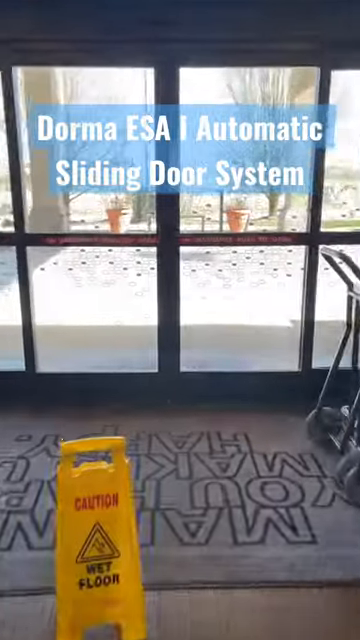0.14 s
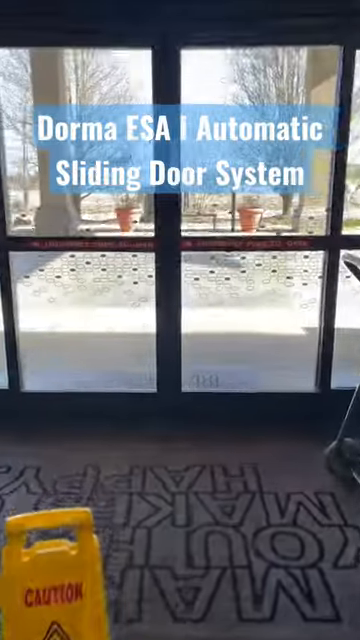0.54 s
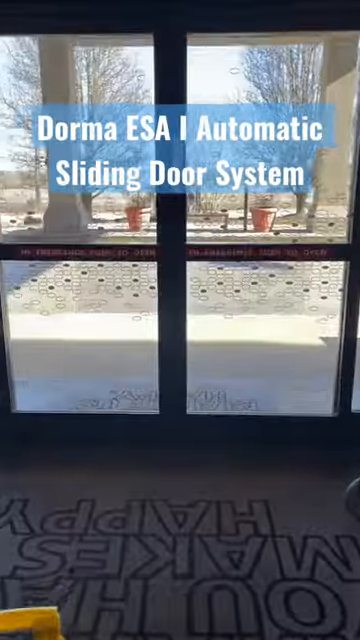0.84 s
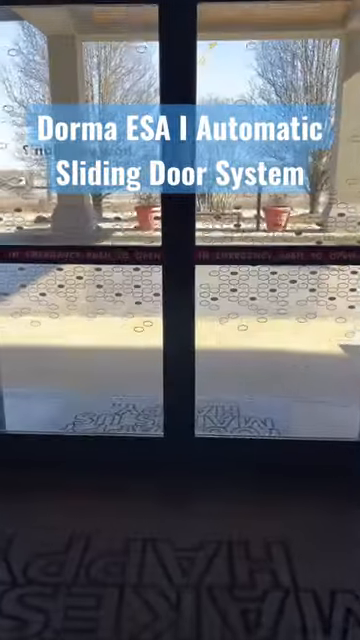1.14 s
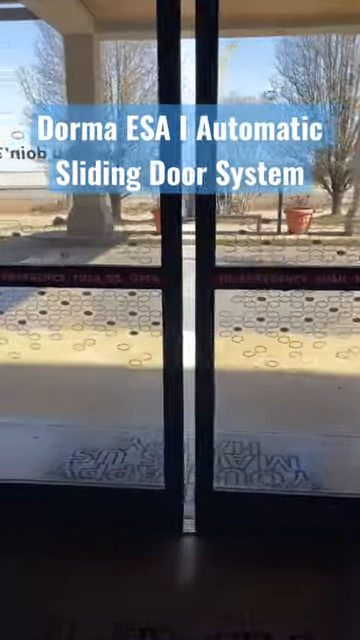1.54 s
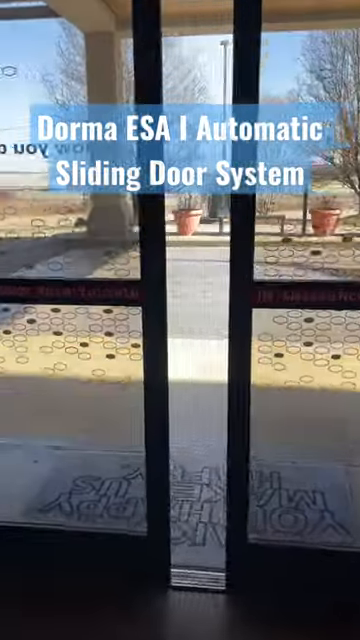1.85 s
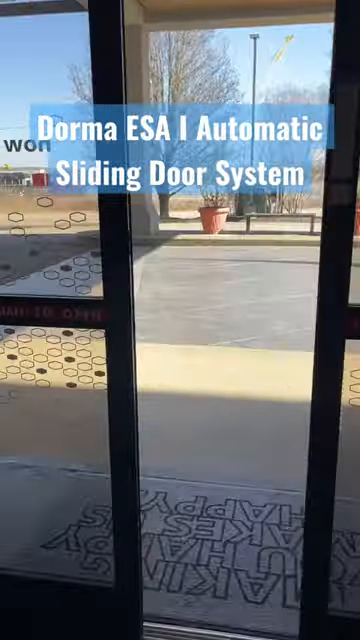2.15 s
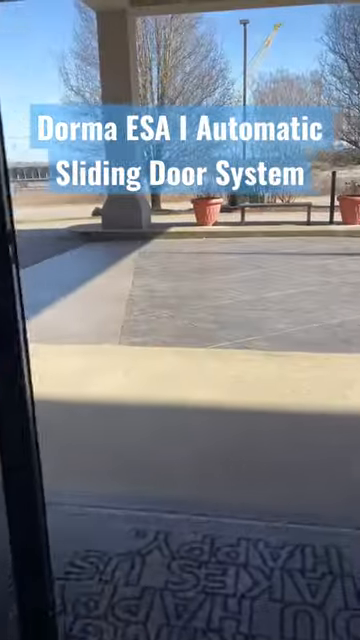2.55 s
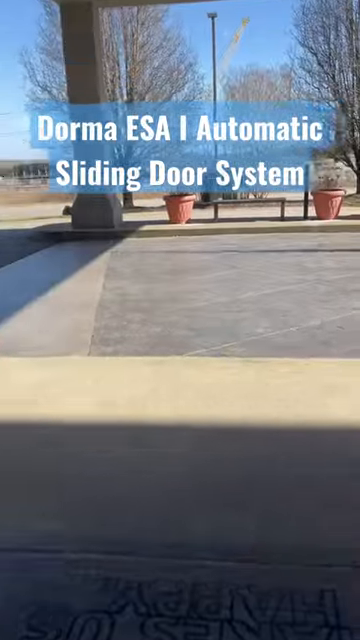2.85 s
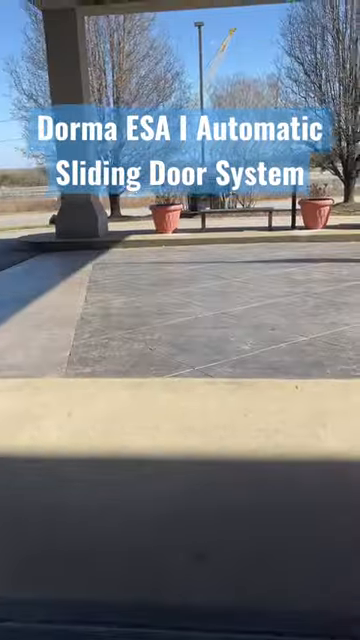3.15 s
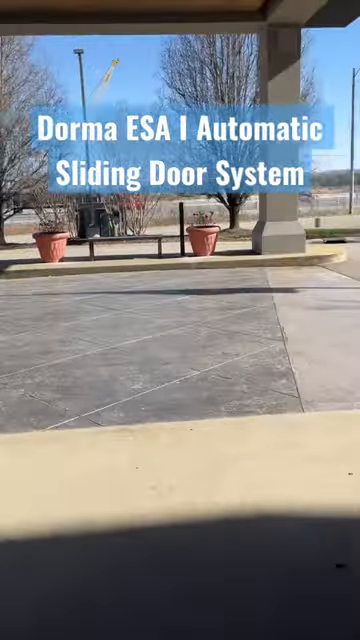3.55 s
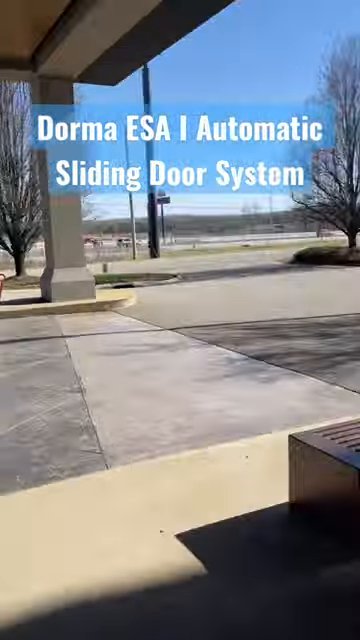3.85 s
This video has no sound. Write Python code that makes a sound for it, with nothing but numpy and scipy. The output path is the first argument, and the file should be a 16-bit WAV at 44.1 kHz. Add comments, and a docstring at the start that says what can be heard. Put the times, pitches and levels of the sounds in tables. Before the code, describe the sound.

Automatic sliding doors click and rumble open after a few soft steps in a quiet lobby. An idling engine and traffic swell, small metal pieces jingle, and a car passes as the microphone is carried outside.

```python
"""Someone carries a phone across a lobby and out through automatic glass sliding doors.
First come a swish, soft steps and the clinks of small metal pieces ringing in their modes.
A double click follows; the drive whines and the rollers rumble as the panels gather speed.
As the gap widens, the throb of an idling engine and the wash of traffic swell, and the metal jingles.
Last, a car passes and low booms rise as the walker steps outside."""
import sys
import numpy as np
from scipy import signal
from scipy.fft import rfft, irfft
from scipy.io import wavfile
from scipy.ndimage import uniform_filter1d

SR = 44100
rng = np.random.default_rng(int(sys.argv[2]) if len(sys.argv) > 2 else 0)


def generate_wav(signal):
    """Clip the signal to [-1, 1] and save it as 16-bit WAV at the path in sys.argv[1]."""
    frames = np.transpose(np.atleast_2d(signal))
    scaled = np.clip(frames, -1, 1) * 32767
    pcm = np.round(scaled).astype(np.int16)
    wavfile.write(sys.argv[1], SR, pcm)


N = 176400
TIME = np.arange(N) / SR
CLICK_RISE_S = 0.0014


def amp(db):
    """Amplitude ratio of a level in decibels."""
    return 10 ** (np.asarray(db) / 20)


def unit(x):
    """Normalisation to rms 1."""
    return x / np.sqrt(np.mean(x ** 2) + 1e-20)


def spectrum_at(table, hz, column=1):
    """Interpolation of a table in log frequency."""
    table = np.array(table)
    return np.interp(np.log(hz + 1), np.log(table[:, 0] + 1), table[:, column])


def envelope_at(table, t, column=1):
    """Linear interpolation of a table in time."""
    table = np.array(table)
    return np.interp(t, table[:, 0], table[:, column])


def resonances(table, hz):
    """Power summation of resonance peaks, in dB."""
    powers = (amp(db) ** 2 / (1 + (2 * (hz - centre) / width) ** 2) ** 1.5 for centre, width, db in table)
    return 10 * np.log10(sum(powers))


def add(mix, start, sound):
    """Superposition of a sound on the mix from a start time in seconds."""
    part = mix[:, max(round(start * SR), 0):][:, :sound.shape[1]]
    part += sound[:, :part.shape[1]]


def drift(rate_hz):
    """Random modulation: low-passed noise of rms 1."""
    hz = np.fft.rfftfreq(N, 1 / SR)
    return unit(irfft(rfft(rng.standard_normal(N)) * np.exp(-(hz / rate_hz) ** 2), N))


def noise(colour, size=N):
    """Spectral shaping: two uncorrelated noises, mid and side, of density colour(hz) in dB/Hz."""
    hz = np.fft.rfftfreq(size, 1 / SR)
    return irfft(rfft(rng.standard_normal((2, size))) * amp(colour(hz)), size) * np.sqrt(SR / 2)


def burst(colour, t60, rise_s):
    """Exponential damping: coloured noise rises, then falls 60 dB in t60 seconds."""
    t = TIME[:SR // 2]
    return unit(noise(colour, size=len(t))) * np.minimum(t / rise_s, 1) * amp(-60 * t / t60)


def lobby_echo(x):
    """Reverberation: reflections from glass and tile merge into a short diffuse tail."""
    tail = burst(lambda f: -10 * np.log10(1 + (f / 9000) ** 2), t60=0.37, rise_s=0.011)
    return signal.fftconvolve(x, tail / np.linalg.norm(tail[0]), axes=1)[:, :N]


# microphone pair (frequency [Hz], coherence [0-1], left phase lead [rad], left minus right [dB])
MIC_PORTS = [(20, 1, 0, 0), (130, .995, 0, .5), (330, .95, 0, 0), (550, .65, .4, .7), (850, .35, 1.2, 3.5),
             (1150, .3, 0, 3.8), (1700, .5, .2, .3), (2300, .2, .9, 4), (3800, .62, .6, 2.4),
             (5300, .4, .6, 4.6), (6300, .62, .2, 1.6), (7200, .5, 1, 3), (8500, .94, 0, .3),
             (9300, .83, -1.4, .4), (10200, .98, -3.1, 0), (11200, .82, -4.9, 0), (12000, .98, -6.2, 0)]
def microphone_pair(x):
    """Partial coherence: two ports add and subtract the side signal, each with its own phase and gain."""
    size = N + 4096
    hz = np.fft.rfftfreq(size, 1 / SR)
    coherence, lead, balance = (spectrum_at(MIC_PORTS, hz, column=k) for k in (1, 2, 3))
    mid, side = rfft(x, size)
    mid *= np.sqrt((1 + coherence) / 2)
    side *= np.sqrt(np.maximum(1 - coherence, 0) / 2)
    lean = amp(balance / 2) * np.exp(.5j * lead)
    return irfft(np.array([(mid + side) * lean, (mid - side) / lean]), size)[:, :N]


# still air of the lobby (frequency [Hz], density [dB/Hz])
AIR_SPECTRUM = [(20, -79), (42, -64.5), (56, -69.5), (76, -59.5), (90, -63.5), (115, -65.5), (160, -66),
                (220, -67.5), (300, -76), (520, -84), (820, -86), (1050, -87.5), (1800, -91.5),
                (2100, -101), (4000, -107), (6500, -110), (11200, -109), (12500, -132)]
def lobby_air():
    """Stationary noise: the room's steady floor, strongest in the bass."""
    return noise(lambda f: spectrum_at(AIR_SPECTRUM, f))


# traffic under the canopy (frequency [Hz], density [dB/Hz])
TRAFFIC_SPECTRUM = [(20, -74), (40, -67), (58, -47), (72, -49), (86, -52.5), (112, -44), (160, -54.5),
                    (235, -49.5), (310, -60), (400, -59.5), (560, -69), (800, -65.5), (1000, -71.5),
                    (1800, -76.5), (2100, -81.5), (2700, -83.5), (4000, -93), (6500, -107), (11000, -111),
                    (12500, -134)]
# gain on the street's sound (time [s], rumble [dB], tyre roar [dB], treble [dB])
DOORWAY_GAIN = [(0, -26, -16, -43), (1.3, -24.5, -15.5, -15.5), (1.6, -14.5, -12.5, -9.5),
                (1.72, -10, -5.5, -9.5), (2.12, -9, -6.5, -6.5), (2.22, -6, -2.5, -7.5),
                (2.7, -2.5, -1.5, 0), (3.0, -.5, -2.5, -3), (3.35, -1.5, 4.5, -2.5), (3.52, -0.5, 3, -4),
                (3.66, 0.5, 2.5, -2), (3.85, -.5, 3.5, -0.5), (4, -1.5, 1.5, 1.5)]
def traffic():
    """Transmission through an aperture: the widening gap admits the street, the treble gaining most."""
    frames = dict(fs=SR, nperseg=1024, noverlap=768)
    hz, t, wash = signal.stft(noise(lambda f: spectrum_at(TRAFFIC_SPECTRUM, f)), **frames)
    band_hz = [280, 700, 3000]
    shares = [np.interp(np.log(hz + 1), np.log(band_hz), row)[:, None] for row in np.eye(3)]
    gain_db = sum(share * envelope_at(DOORWAY_GAIN, t, column=k) for k, share in enumerate(shares, 1))
    # the level wanders in patches of pitch and time, least in the rumble
    patches = uniform_filter1d(rng.standard_normal(wash.shape[1:]), size=10, axis=0)
    patches = unit(uniform_filter1d(patches, size=12, axis=1))
    patch_db = (1.5 - shares[0]) * patches
    _, admitted = signal.istft(wash * amp(gain_db + patch_db), **frames)
    flutter_db = 0.7 * drift(28)
    return admitted[:, :N] * amp(flutter_db)


# tyre resonances (frequency [Hz], width [Hz], peak density [dB/Hz])
TYRE_PEAKS = [(776, 44, -58.5), (875, 38, -56.5), (1140, 340, -67.5)]
def passing_car(nearest_s=3.42, half_width_s=.2):
    """Attenuation with distance: tyres sing on the road, loudest as the car passes nearest."""
    return noise(lambda f: resonances(TYRE_PEAKS, f)) / (1 + ((TIME - nearest_s) / half_width_s) ** 2)


# harmonics of the idling engine (time [s], fundamental level [dB], octave level [dB])
IDLE_LEVELS = [(0, -43, -42), (0.2, -38.5, -45), (0.5, -36.5, -51.5), (0.9, -37.5, -44.5),
               (1.33, -44, -49.5), (1.41, -40, -37), (2.0, -49, -36), (2.55, -61, -32.5), (2.8, -48, -36),
               (3.05, -37, -31.5), (3.48, -32, -31.5), (3.66, -21.5, -34.5), (3.72, -24.5, -30),
               (3.85, -39, -43), (4, -24.5, -33)]
def engine(firing_hz=66.05, waver_hz=1.47, throb_db=1.1):
    """Periodic excitation: slightly uneven firing gives a wavering fundamental and its octave."""
    phase = 2 * np.pi * np.cumsum(firing_hz + waver_hz * drift(4.6)) / SR
    mid = np.zeros(N)
    for harmonic in (1, 2):
        level_db = envelope_at(IDLE_LEVELS, TIME, column=harmonic) + throb_db * drift(6.2)
        mid += np.sqrt(2) * amp(level_db) * np.sin(harmonic * phase)
    return np.array([mid, np.zeros(N)])


# drones of the entrance (frequency [Hz], width [Hz], indoor level [dB], outdoor level [dB])
DRONE_BANDS = [(197, 8.8, -55.5, -67.5), (208.5, 4, -54.5, -41), (237.8, 7, -57.5, -42),
               (331.9, 6.9, -60, -46), (1864, 50, -82, -59.5)]
def entrance_drones():
    """Narrow-band noise is heard as pitch; its outdoor share enters with the street's rumble."""
    out = np.zeros((2, N))
    admitted = amp(envelope_at(DOORWAY_GAIN, TIME))
    for hz, width, indoor_db, outdoor_db in DRONE_BANDS:
        band = unit(noise(lambda f: -20 * np.log10(1 + (2 * (f - hz) / width) ** 2)))
        out += band * (amp(indoor_db) + amp(outdoor_db) * admitted)
    return out


# booms at the threshold (time [s], duration [s], frequency [Hz], wander width [Hz], peak level [dB])
BOOM_SWELLS = [(3.516, .3, 116, 20, -30.5), (3.571, 0.13, 213.5, 6.4, -26.5),
               (3.677, 0.24, 238.1, 12.8, -30)]
def booms():
    """Narrow resonance: low, wandering tones swell and fade as the walker steps outside."""
    out = np.zeros((2, N))
    for start, length, hz, width, db in BOOM_SWELLS:
        arch = np.sin(np.pi * np.clip((TIME - start) / length, 0, 1))
        phase = 2 * np.pi * np.cumsum(hz + width / 2 * drift(18.6)) / SR
        out[0] += np.sqrt(2) * amp(db) * arch * np.sin(phase)
    return out


# a swish, like cloth brushing (frequency [Hz], density [dB/Hz])
SWISH_SPECTRUM = [(100, -87), (350, -75), (800, -84), (1100, -81), (1500, -93), (2000, -88), (2500, -95),
                  (5000, -93), (6800, -96), (8500, -84), (10800, -84), (12000, -87.5), (12900, -100)]
def swish(hold_s=0.16, fall_db_per_s=56, grain_db=0.88):
    """Random amplitude modulation lends grain to a bright noise that holds, then fades."""
    fade_db = -fall_db_per_s * np.maximum(TIME - hold_s, 0)
    return noise(lambda f: spectrum_at(SWISH_SPECTRUM, f)) * amp(fade_db + grain_db * drift(150))


# footfalls and scuffs (time [s], level [dB], t60 [s], centre [Hz], half-width [octaves], rise [s])
FOOTFALLS = [(.117, -36.5, 0.11, 740, 0.29, .01), (.15, -34.5, 0.39, 265, 0.48, 0.0049),
             (.183, -54.5, 0.99, 1400, 0.74, 0.0029), (0.299, -49, 0.13, 2160, 0.54, .004),
             (.36, -37.5, 0.12, 313, 0.55, 0.0016), (.896, -53, 0.14, 2070, 0.37, .004),
             (1.015, -40.5, 0.13, 1830, 0.8, 0.033), (1.19, -42.5, 0.12, 370, .4, .004),
             (1.21, -56.5, 0.18, 2820, 0.71, .003), (1.672, -38, 0.074, 690, 0.35, 0.0022),
             (2.18, -39, 0.26, 700, 0.63, .004), (2.227, -40, 0.06, 670, 0.27, .002),
             (2.688, -45.5, .1, 4000, 0.46, .002), (2.838, -47.5, 0.14, 3900, 0.43, .004),
             (3.56, -47.5, 0.22, 2340, 0.74, 0.0033), (3.692, -31, 0.054, 750, 0.33, 0.0017)]
def steps():
    """Damped impact and friction: soles on floor and mat each excite one broad band of noise."""
    out = np.zeros((2, N))
    for start, db, t60, hz, octaves, rise_s in FOOTFALLS:
        def colour(f):
            band_db = -20 * np.log10(1 + (np.log2((f + 1) / hz) / octaves) ** 2)
            return band_db - 10 * np.log10(1 + (f / (2 * hz)) ** 2)
        add(out, start, amp(db) * burst(colour, t60, rise_s))
    return out


# ticks of shoes and door gear (time [s], level [dB], t60 [s], emphasised frequency [Hz])
TICK_EVENTS = [(0.295, -57, 0.096, 5870), (0.351, -61, 0.091, 4400), (.40, -59, 0.11, 6000),
               (1.049, -59, 0.18, 4000), (1.118, -45, 0.016, 6900), (1.196, -56, 0.087, 8000),
               (1.209, -51, 0.13, 6200), (2.41, -55, 0.092, 7000), (3.215, -57, 0.13, 8400),
               (3.958, -71, .1, 8200)]
# their common spectrum (frequency [Hz], relative level [dB])
TICK_SPECTRUM = [(900, -6), (2200, 11), (3200, 9), (4600, 9.5), (6100, 8), (7200, 8), (8200, 15), (9200, 1),
                 (10200, -1), (11400, 4), (12800, -30)]
def ticks(ripple_db=1.5, tilt_db_per_octave=5.5):
    """Hard impact: brief contact gives a broad spectrum, coloured by each tick's uneven resonances."""
    out = np.zeros((2, N))
    grid_hz = np.arange(0, 14000, 300)
    for start, db, t60, hz in TICK_EVENTS:
        peaks_db = ripple_db * rng.standard_normal(len(grid_hz))
        def colour(f):
            tilt_db = tilt_db_per_octave * abs(np.log2((f + 1) / hz))
            return spectrum_at(TICK_SPECTRUM, f) + np.interp(f, grid_hz, peaks_db) - tilt_db
        add(out, start, amp(db) * burst(colour, t60, CLICK_RISE_S))
    return out


def chatter(size, contacts_per_s=350):
    """A Poisson process: small contacts of random strength at random moments."""
    return rng.standard_normal(size) * (rng.random(size) < contacts_per_s / SR)


# modes of small metal pieces, like keys (frequency [Hz], relative level [dB], t60 [s])
METAL_MODES = [(4400, -11.5, .05), (5173, -16, 0.12), (6460, -12, .1), (6850, -15, .09), (7500, -23, 0.093),
               (8290, -12, .1), (8790, -11, 0.11), (8915, -17, .12), (11000, 4.5, 0.091), (11400, -11, .05),
               (11700, -18, .04)]
def metal_ring(contacts):
    """Modal vibration: every contact excites the same set of damped sinusoids."""
    t = TIME[:SR // 4]
    phases = rng.uniform(0, 2 * np.pi, (len(METAL_MODES), 2, 1))
    ring = sum(amp(db - 60 * t / t60) * np.sin(2 * np.pi * hz * t + phase)
               for (hz, db, t60), phase in zip(METAL_MODES, phases))
    ring *= np.minimum(t / CLICK_RISE_S, 1)
    return signal.fftconvolve(contacts[None], ring, axes=1)[:, :len(contacts)]


# metal scraping on metal (frequency [Hz], relative level [dB])
SCRAPE_SPECTRUM = [(1000, 4), (2500, -3.5), (4500, -2.5), (6000, -0.5), (8000, 3.5), (11200, -2.5),
                   (12100, -12), (12800, -26)]
# clinks (time [s], level [dB], t60 of scrape and rebounds [s], ring gain [dB])
CLINK_EVENTS = [(0.4552, -40, 0.037, -1.5), (0.469, -50, 0.18, -2), (.505, -50.5, 0.23, -3),
                (2.693, -45.5, 0.09, -20), (2.747, -48, 0.25, -16), (2.79, -60, .1, 3),
                (2.839, -46, 0.094, 5), (2.857, -51, 0.19, 12), (2.89, -54, 0.12, 10),
                (3.081, -56.5, 0.21, 1)]
def clinks(rebound=.35, grit_db=2):
    """Impact and rebound: each strike scrapes, and its dying bounces set the metal ringing."""
    out, t = np.zeros((2, N)), TIME[:SR // 2]
    for start, db, t60, ring_db in CLINK_EVENTS:
        contacts = (t == 0) + rebound * chatter(len(t)) * amp(-60 * t / t60)
        scrape = burst(lambda f: spectrum_at(SCRAPE_SPECTRUM, f), t60, CLICK_RISE_S)
        scrape *= amp(grit_db * drift(400)[:len(t)])
        ring = metal_ring(contacts / np.linalg.norm(contacts))
        add(out, start, amp(db) * (scrape + amp(ring_db) * ring))
    return out


# the pieces rattle together (time [s], duration [s], level [dB])
RATTLE_EVENTS = [(2.686, .14, -51.5), (2.818, 0.096, -51)]
def rattles(grit_db=2, ring_db=-11):
    """Sliding friction: dense contacts between the pieces merge into an even jingle."""
    arches = sum(amp(db) * np.sqrt(np.maximum(1 - (2 * (TIME - start) / length - 1) ** 2, 0))
                 for start, length, db in RATTLE_EVENTS)
    scrape = unit(noise(lambda f: spectrum_at(SCRAPE_SPECTRUM, f)) * amp(grit_db * drift(200)))
    ring = unit(metal_ring(chatter(N)))
    return arches * (scrape + amp(ring_db) * ring)


# a double click, like a catch letting go (time [s], level [dB], t60 [s])
CATCH_SNAPS = [(.893, -45.5, 0.086), (0.904, -47.5, 0.12)]
# its resonances (frequency [Hz], width [Hz], relative level [dB])
CATCH_PEAKS = [(3900, 660, -18), (4920, 260, -3), (5380, 240, -3), (6900, 270, -4), (8000, 300, -3),
               (8900, 430, -1), (9360, 510, 0), (11400, 600, -11)]
def catch():
    """Impulsive excitation: two quick snaps ring the high resonances of a small part."""
    out = np.zeros((2, N))
    for start, db, t60 in CATCH_SNAPS:
        add(out, start, amp(db) * burst(lambda f: resonances(CATCH_PEAKS, f), t60, CLICK_RISE_S))
    return out


def drive_whine(length_s=.24, hz=4520, half_width_hz=105, level_db=-73.5):
    """Narrow-band noise: the door's drive sounds a brief, faint high pitch."""
    size = round(length_s * SR)
    band = unit(noise(lambda f: -20 * np.log10(1 + ((f - hz) / half_width_hz) ** 2), size))
    return amp(level_db) * band * signal.windows.tukey(size, .3)


# rollers on their track at full speed (frequency [Hz], density [dB/Hz])
ROLLER_SPECTRUM = [(40, -67), (85, -73), (115, -59), (170, -50), (220, -64.5), (270, -57), (400, -64),
                   (650, -68.5), (1200, -77), (2200, -104), (4000, -99), (6500, -102), (8800, -100),
                   (11200, -102), (12500, -132)]
def sliding_door(start_s=1.195, full_speed_s=2.21, slowing_s=2.68, rest_s=4.33, flutter_db=1):
    """Rolling noise: rumble and hiss grow with the panels' speed; the drive whines as they set off."""
    speed = np.interp(TIME, [start_s, full_speed_s, slowing_s, rest_s], [0, 1, 1, 0])
    out = noise(lambda f: spectrum_at(ROLLER_SPECTRUM, f)) * speed * amp(flutter_db * drift(32))
    add(out, start=1.24, sound=drive_whine())
    return out


def scene():
    """Superposition: close, nearly dry metal, more reverberant knocks, the door and the street beyond."""
    metal = clinks() + rattles()
    knocks = ticks() + catch() + steps()
    echo = lobby_echo(amp(-14) * metal + amp(-6.5) * knocks)
    indoors = lobby_air() + swish() + metal + knocks + echo
    door = sliding_door()
    outdoors = engine() + entrance_drones() + traffic() + passing_car() + booms()
    return microphone_pair(indoors + door + outdoors)


def record(dry):
    """Band limiting: the phone's low-pass filter removes the highest treble."""
    low_pass = signal.firwin(511, cutoff=12760, window=("kaiser", 9), fs=SR)
    return signal.oaconvolve(dry, low_pass[None], "same")


dry = scene()
out = record(dry)
generate_wav(out)
```